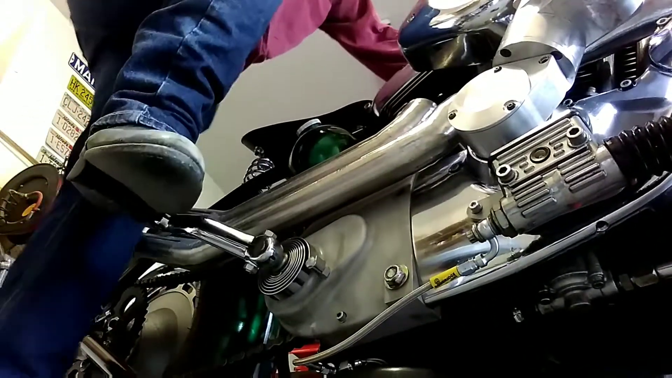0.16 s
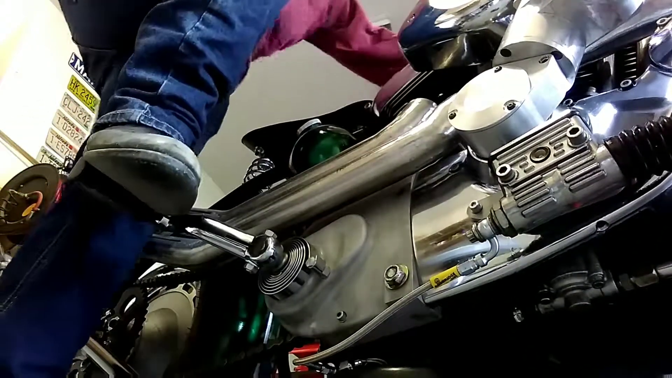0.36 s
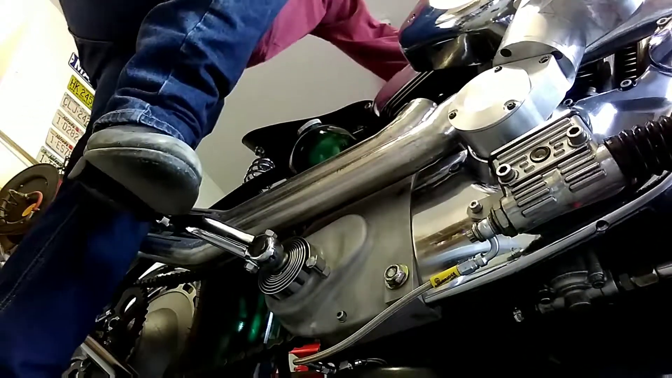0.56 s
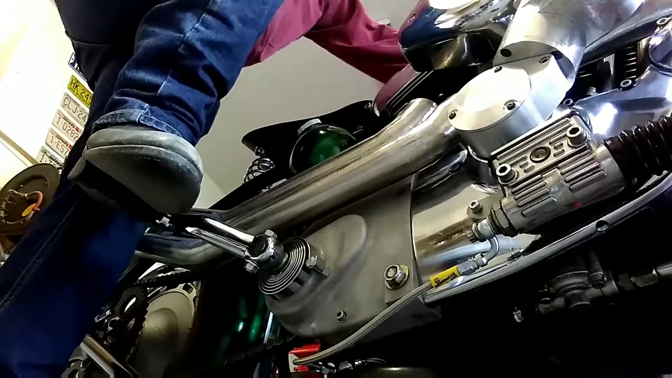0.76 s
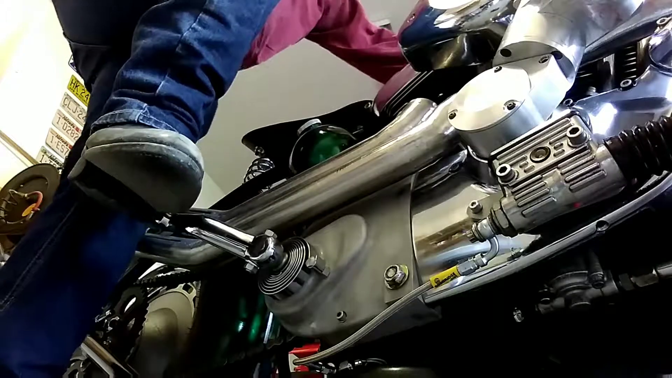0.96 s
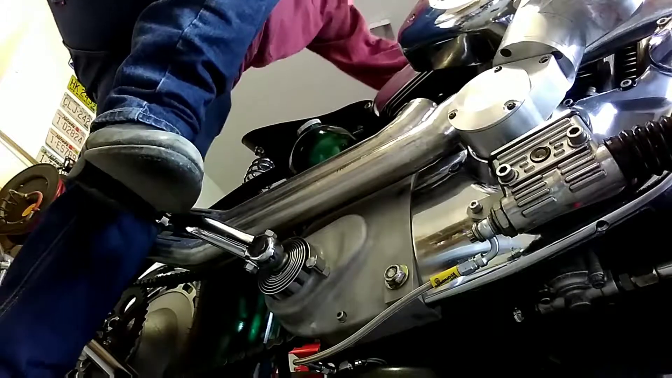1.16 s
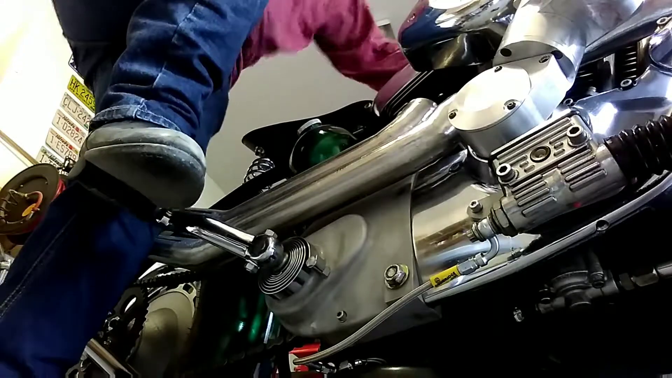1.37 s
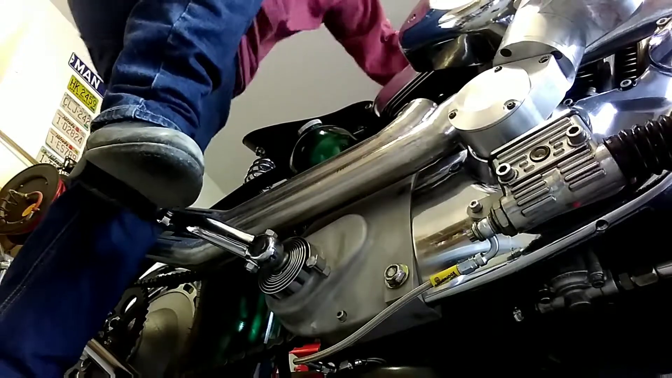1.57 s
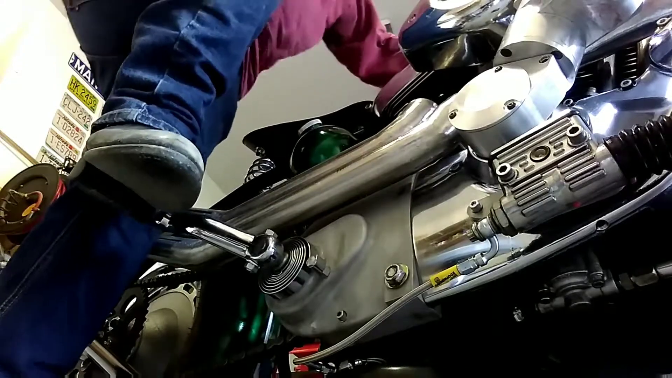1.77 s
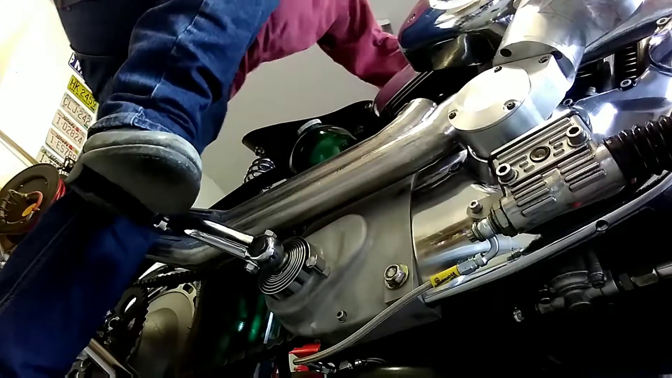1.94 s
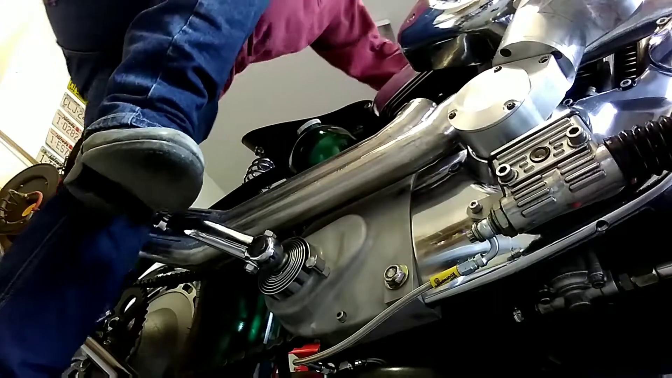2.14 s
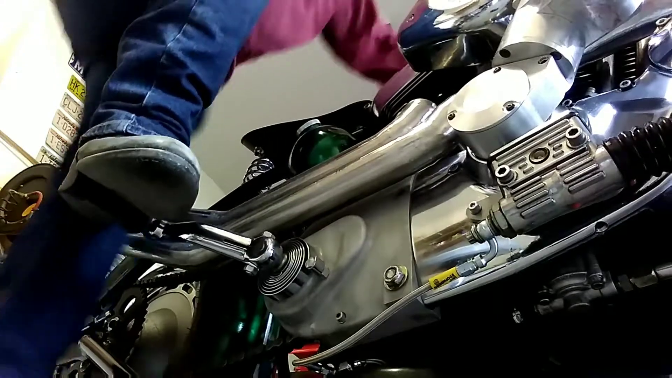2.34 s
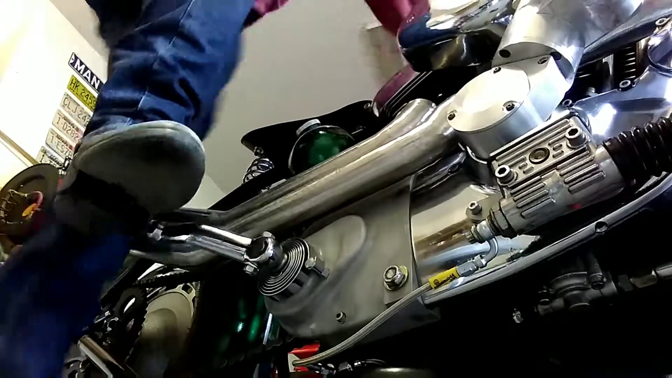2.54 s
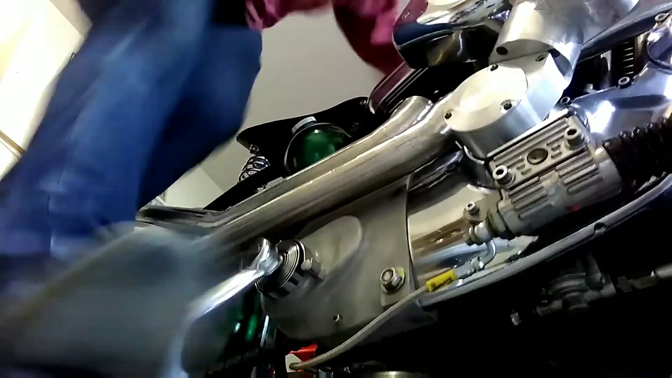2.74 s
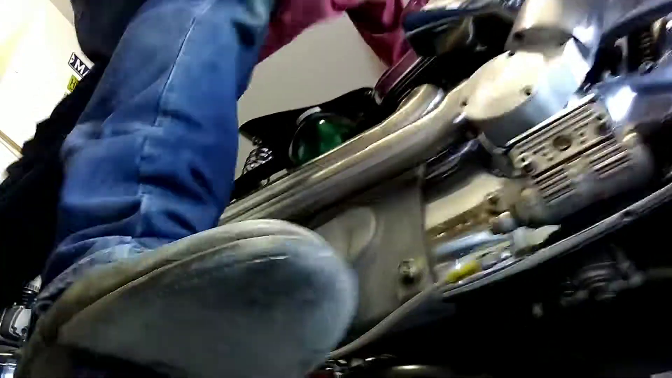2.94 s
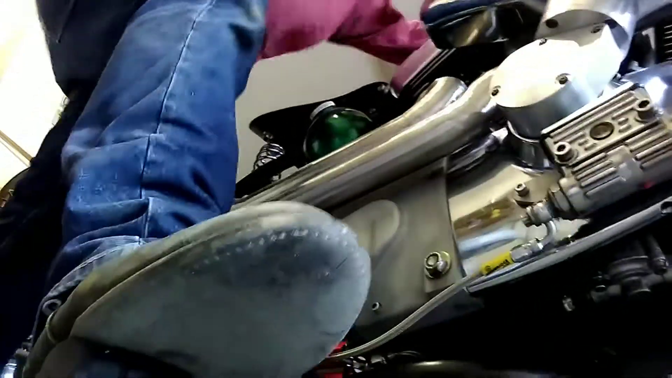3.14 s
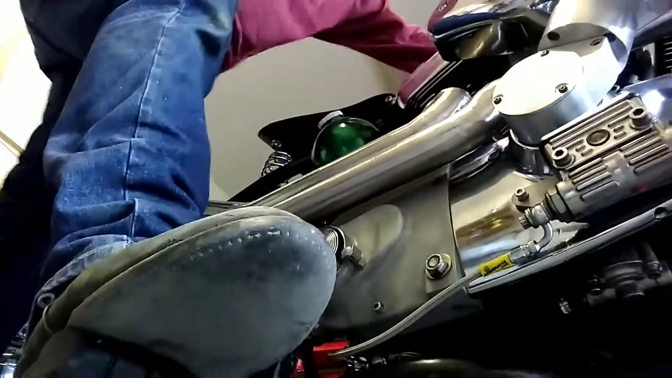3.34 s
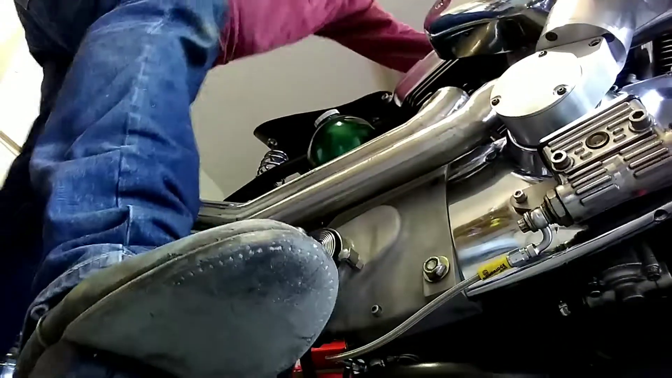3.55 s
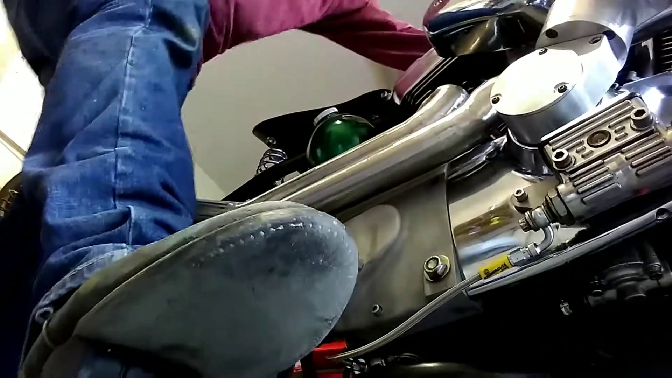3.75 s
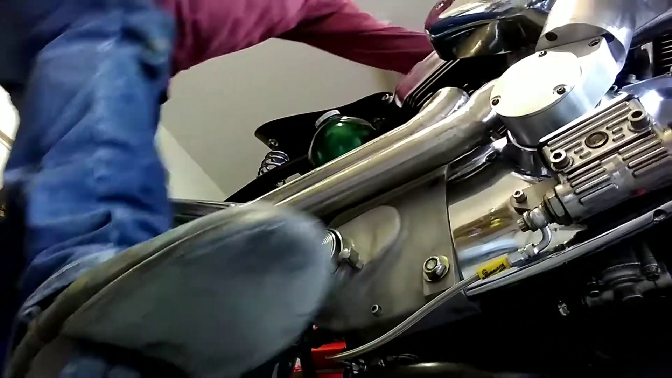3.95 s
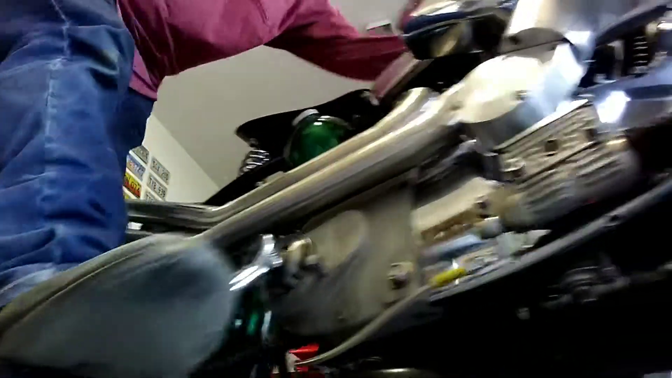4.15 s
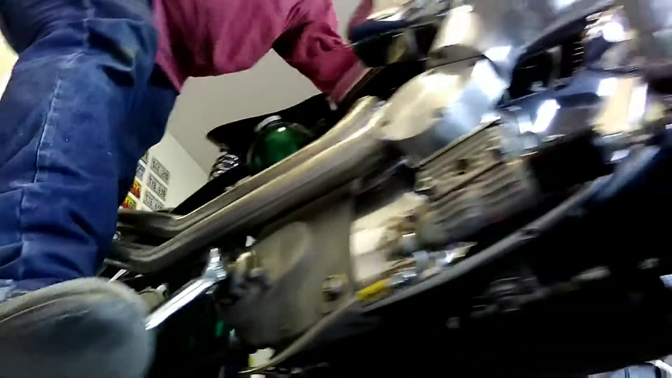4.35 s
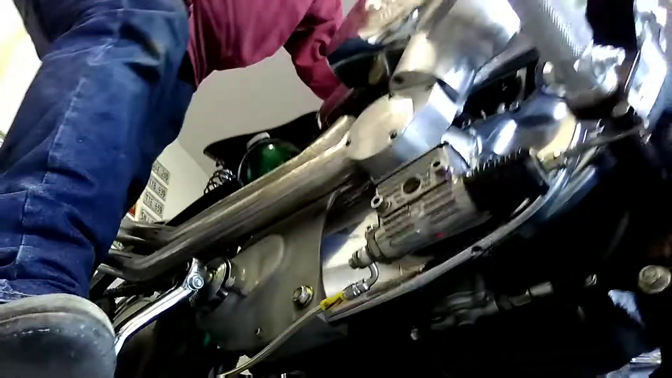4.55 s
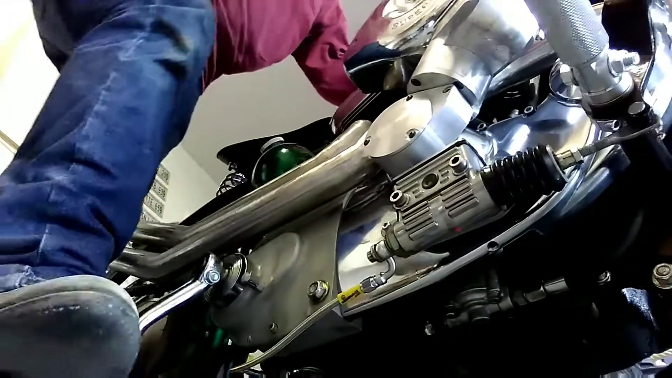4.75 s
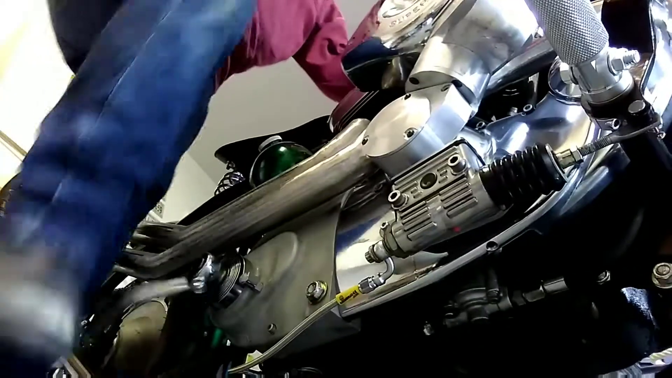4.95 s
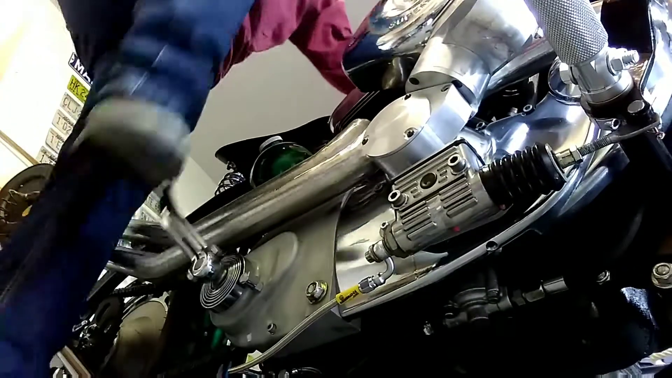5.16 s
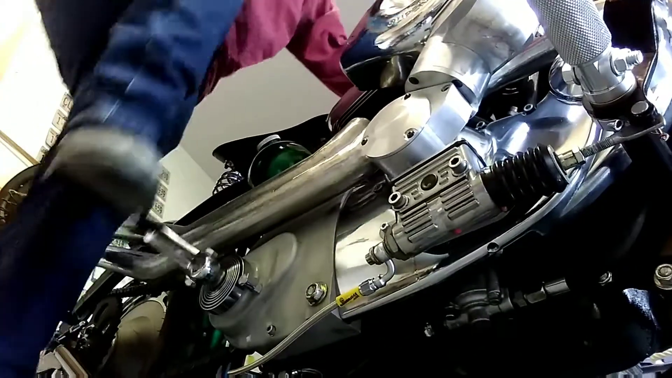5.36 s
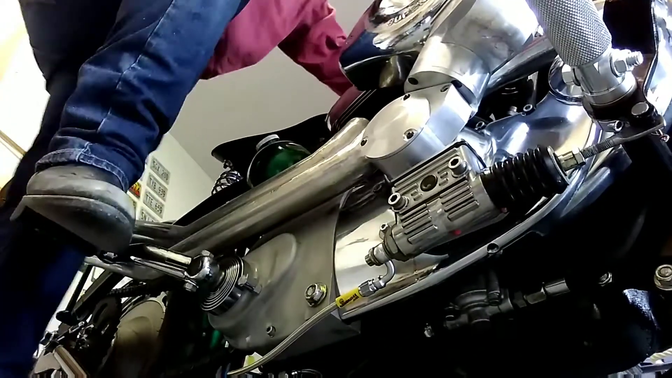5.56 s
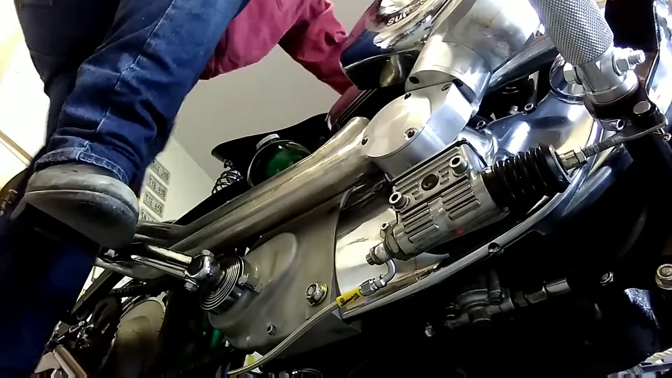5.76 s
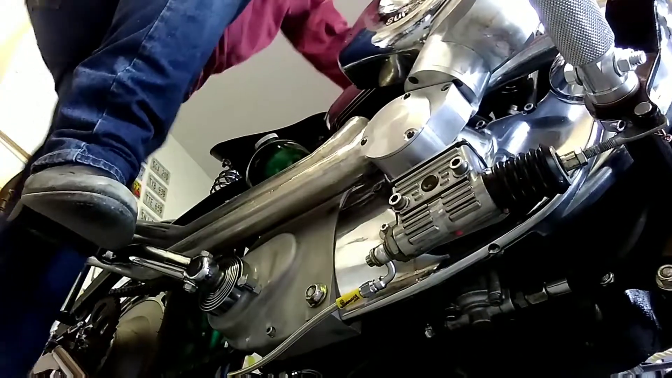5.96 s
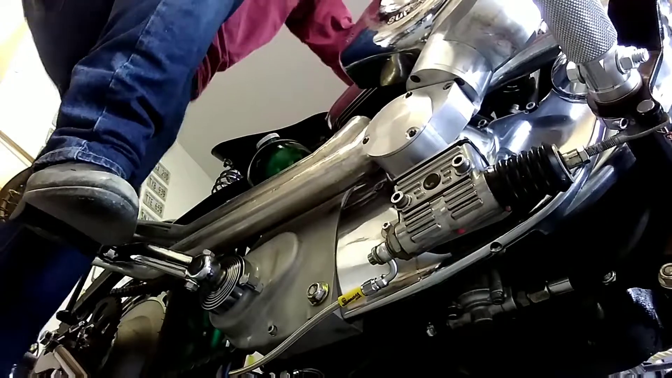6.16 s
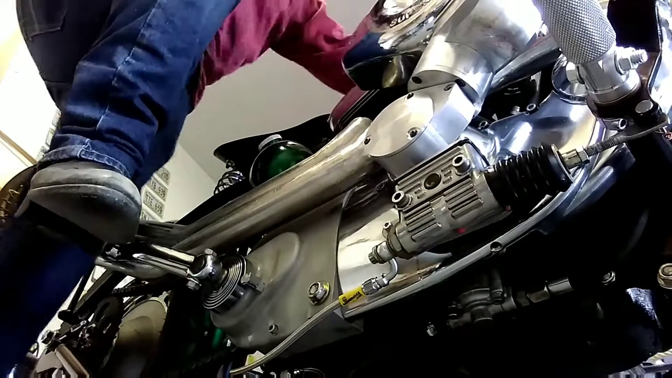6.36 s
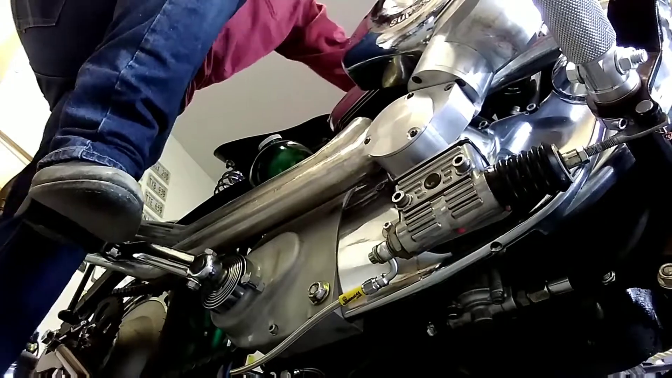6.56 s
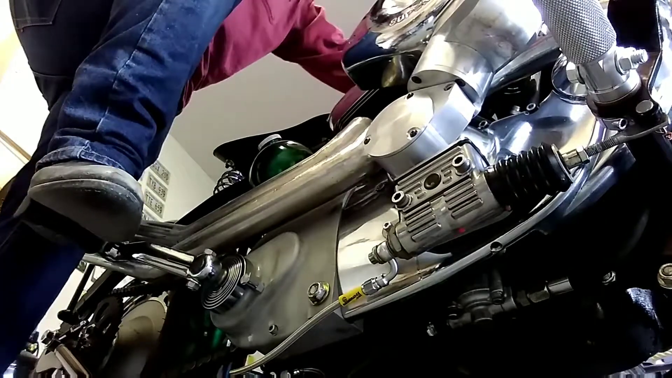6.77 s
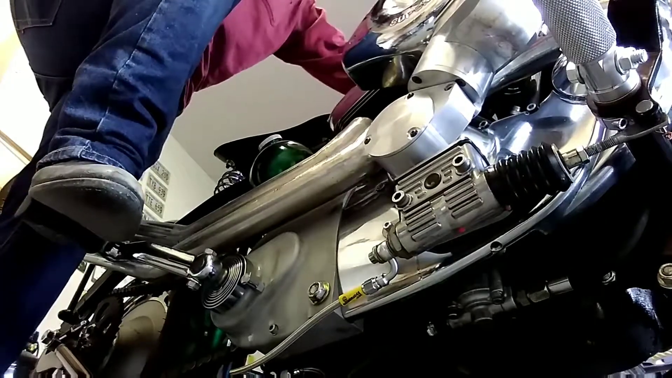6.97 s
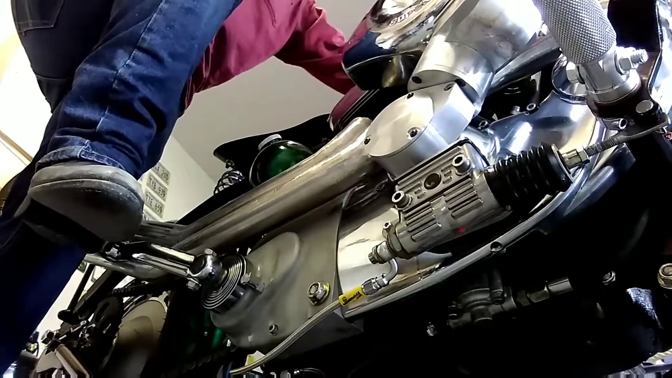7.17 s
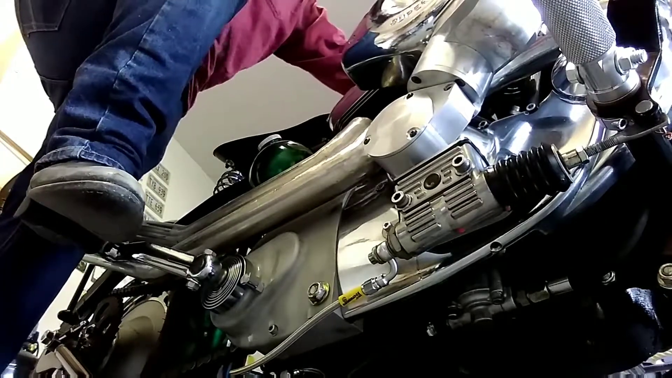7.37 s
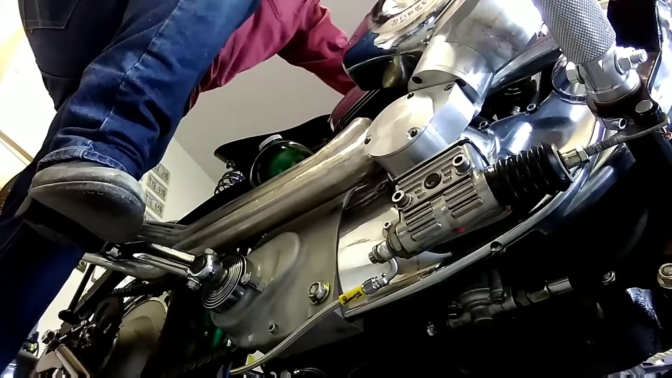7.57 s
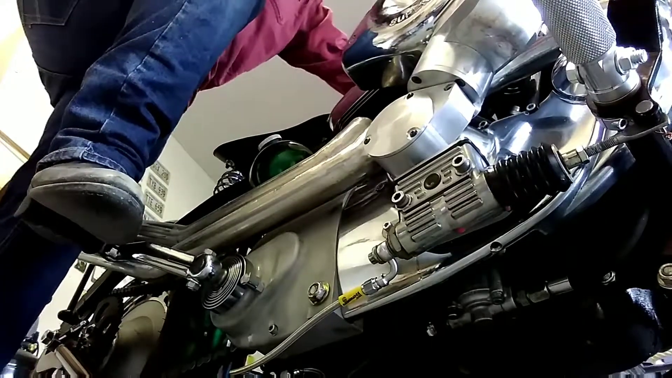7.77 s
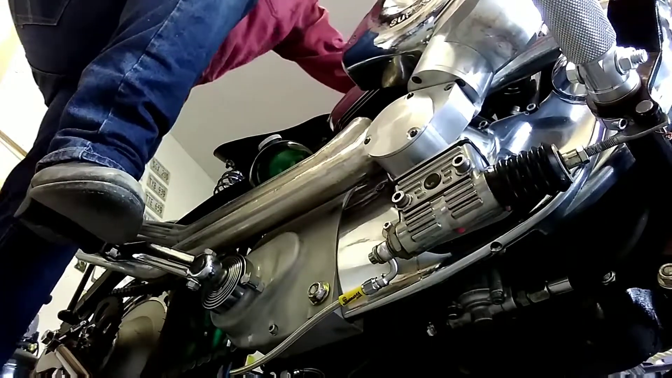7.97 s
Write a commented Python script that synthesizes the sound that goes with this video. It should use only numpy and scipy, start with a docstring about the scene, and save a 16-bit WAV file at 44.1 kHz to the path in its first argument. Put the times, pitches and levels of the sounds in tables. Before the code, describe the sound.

A motorcycle kick-starter slams down in a garage; the engine whirrs and gulps air without catching, then the lever ratchets back with metallic clicks.

```python
"""A motorcycle in a bare-walled garage, close to the microphone, is kicked over once and does not catch.
Over low rumble and faint hum, a sole scuffs and squeaks, denim (filtered grains) swishes and parts knock.
The lever bottoms out and shakes the frame (decaying low modes); the engine whirrs (grains), gulps air
five times (gliding resonances) and runs down. The lever comes up with a clank and a burst of ratchet teeth
(ringing modes and noise); then air creeps into the intake, denim swishes and small parts knock to the end."""
import sys
import numpy as np
from scipy import signal
from scipy.fft import rfft, irfft
from scipy.io import wavfile
from scipy.ndimage import uniform_filter1d, minimum_filter1d

SR = 44100
rng = np.random.default_rng(int(sys.argv[2]) if len(sys.argv) > 2 else 0)


def dump_mix(stems):
    """Bounce the given channels to the path in sys.argv[1] as a 16-bit WAV at rate SR."""
    frames = np.atleast_2d(stems).T  # one column per channel
    limited = np.clip(frames, -1, 1)  # hard clip at full scale
    pcm = np.round(limited * 32767).astype(np.int16)
    wavfile.write(sys.argv[1], SR, pcm)


N = 353241
T = np.arange(N) / SR
HIT_T = T[:SR // 2]
TOP_HZ = 15700  # upper limit of the recorded sound

# Room rumble, spectrum: hz, level_db
RUMBLE_COLOUR = [(25,-15), (55,-2), (86,-12.5), (122,-3), (160,-14), (340,-19), (700,-27.5), (1500,-30),
                 (3600,-38), (7000,-38.5), (11200,-32), (15500,-46)]
# Shoe scuffing on the lever: start_s (peak), relative level_db, rise_s, fall_s
SCUFFS = [ (.01, -48.5, 0.038, .04), (1.24, -70.5, .11, .12), (1.92, -70, 0.15, .06),
          (2.29, -66.5, 0.028, .06), (2.445, -50, 0.037, .025), (4.115, -43.5, 0.016, 0.022),
          (4.68, -42.5, .05, 0.048), (4.921, -42.5, .01, .01), (7.61, -51.5, .03, .04)]
# Squeaks of the rubber sole: start_s (middle), level_db, half_length_s, pitch_hz, glide_octaves_per_s, width_hz
SQUEAKS = [ (.015, -52.5, 0.033, 1056, -1, 400), (1.865, -67, 0.036, 4000, 2.5, 420),
           (2.325, -66, 0.044, 4010, 6, 420), (4.015, -58.5, 0.021, 1770, 2.5, 450),
           (7.13, -76.5, 0.073, 3630, 1, 602), (7.535, -59, .02, 2200, -7, 481)]
# Swishes of denim: start_s (peak), level_db, rise_s, fall_s
SWISHES = [(.155,-39.5,0.023,0.037), (0.248,-46,.0015,0.0063), (1.11,-55,0.029,0.054),
           (1.25,-56,0.034,0.032), (2.0,-56.5,0.022,0.022), (2.222,-56.5,0.0024,0.068),
           (2.342,-50,0.0025,0.01), (2.475,-38,0.037,0.017), (2.787,-18.5,0.039,0.041),
           (2.959,-16,0.012,0.01), (3.055,-11,0.0091,0.024), (3.737,-16.5,0.017,0.021),
           (4.475,-62,.002,0.023), (5.65,-36.5,0.026,0.02), (6.066,-30.5,0.0082,0.031),
           (6.133,-25.5,0.014,0.016), (6.174,-38.5,.002,.012), (6.227,-40,0.0025,0.011),
           (6.55,-65,0.063,0.087), (6.77,-65,0.076,0.034), (7.36,-51.5,0.0066,0.036),
           (7.6,-46.5,0.0054,0.049)]
# Denim, spectrum: hz, level_db
DENIM_COLOUR = [(300, -44), (1200, -27), (2200, -17), (5000, -13.5), (7500, -13.5), (10000, -7.5),
                (12400, 2.5), (14000, -4), (15800, -6.5)]
# Air drawn slowly through the intake: start_s (peak), level_db, rise_s, fall_s, pitch_hz, glide_octaves_per_s
DRAUGHTS = [ (.2, -60, 0.16, 0.19, 668.2, .05), (2.972, -27, 0.014, 0.021, 684.2, 1),
            (3.33, -37, .04, 0.094, 653, .1), (3.65, -49, 0.061, .045, 683.1, .7),
            (5.6, -42, 0.15, 0.077, 643.4, 1.15)]
# Resonances of hissing air: centre_hz, width_hz, relative level_db
HISS_BANDS = [(4300, 210, -22), (7170, 1400, -16), (8400, 210, -12), (9920, 550, -1.5), (10750, 300, -7.5),
              (11030, 320, -6), (12150, 350, -8)]
# Lever and linkage knocks: start_s, level_db, centre_hz, thud_db, click_db, t60_s
KNOCKS = [ (0.246, -56.5, 500, 7, -17, 0.099), (.917, -49, 1836, -27, -6.5, .14),
          (1.402, -64.5, 1200, -37, -27, .08), (1.512, -62.5, 1810, -7, -27, .06),
          (2.622, -43.5, 659, -20.5, -12, .14), (2.677, -33.5, 671, -25.5, -16.5, .09),
          (2.781, -3, 1181, -6, -10.5, .07), (2.804, -18.5, 879, -3.5, -17, .09),
          (2.953, -22.5, 2630, -3.5, -6.5, .09), (3.025, -26.5, 886, 3.5, -8, .035),
          (3.148, -27, 1130, 2.5, -13, .07), (3.23, -24.5, 1290, -18, -20, .25),
          (3.319, -30, 1900, -13.5, -21, .04), (3.384, -30.5, 2410, -7.5, -18, .09),
          (3.653, -39, 1471, -29, -3, .07), (4.091, -45.5, 700, -29.5, -29, 0.2),
          (4.135, -37, 1510, -16.5, -10.5, 0.18), (4.537, -42.5, 617.5, -1.5, -10.5, .11),
          (4.582, -21, 1240, -16.5, -19.5, 0.26), (4.656, -44.5, 2000, 3, -1, .13),
          (4.742, -47, 598.4, 0, -27, .13), (4.882, -46.5, 1200, -23.5, -23, .22),
          (4.928, -22.5, 1880, -22, -15, .12), (5.313, -20, 1094, -19.5, -16, .15),
          (6.156, -55, 218, 3, -8, .11), (6.222, -57.5, 199.8, 4, -16, .1),
          (7.272, -58, 1910, -33, -9, .13), (7.351, -39.5, 1069, -40, -12.5, .092),
          (7.494, -50.5, 3600, -28, -34, .074), (7.513, -51.5, 2230, -34, -14, .09),
          (7.59, -46.5, 1110, -31, 0.5, .16), (7.948, -56.5, 2700, -17, -9, .22)]
# Ringing engine case, before contact damping: pitch_hz, relative level_db, t60_s
CASE_MODES = [(428, -1.5, 0.71), (678.6, 2, 0.22), (815, 0, 0.1), (881, -0.5, 0.36), (1123, -2.5, 0.16),
              (1682, -7, 0.19), (2130, -5.5, 0.3), (2550, -4.5, 0.34), (2724, -3, .18), (2780, 0, .24),
              (2990, 0.5, 0.22), (3032, 1.5, 0.13)]
# Knock body and sole scuff, spectrum: hz, level_db
KNOCK_COLOUR = [(150, -15.5), (350, 2), (750, -0.5), (1400, -1.5), (2100, -1.5), (2900, -2), (3400, -4.5),
                (5000, -18), (9000, -27.5), (15000, -44)]
# Thud from the frame, spectrum: hz, level_db
THUD_COLOUR = [(50, -23.5), (110, -8), (180, -0.5), (300, -2.5), (420, -2.5), (700, -26.5), (3000, -53)]
# Click of the contact, spectrum: hz, level_db
CLICK_COLOUR = [(1000, -34.5), (2500, -14.5), (4500, 2.5), (8000, -4.5), (11500, 0.5), (15500, -12.0)]
# Turns of the engine: start_s (gulp peak), gulp_db, gulp_half_length_s, pitch_hz, glide_octaves_per_s,
# hiss_db, stroke_half_length_s (its fall; the rise is shorter)
TURNS = [ (2.753, -22, .032, 543, -5.5, -24.5, 0.069), (2.943, -19, .01, 553, 5, -28.5, 0.072),
         (3.137, -27, .024, 608.3, 6.5, -29.5, .06), (3.348, -31.5, .014, 633.7, 0, -32.5, 0.084),
         (3.586, -35.5, 0.0091, 608, 3.5, -45, 0.18)]
# Chattering gears, spectrum: hz, level_db
GEAR_COLOUR = [(60, -2), (160, -4.5), (320, -7.5), (650, -10.5), (1000, 0), (2200, -1), (3400, -4.5),
               (4600, -17), (8000, -11.5), (15000, -35)]
# Jolts that rock the frame: start_s, level_db, rise_s, t60_s
JOLTS = [(2.791, -6, 0.0017, 0.59), (3.136, -23, 0.019, 0.82), (3.352, -26, 0.0024, 0.27),
         (5.02, -42, .02, .7), (5.318, -38.5, 0.0034, .2)]
# Modes of the frame: pitch_hz, relative level_db, share of the jolt's t60 (no unit)
FRAME_MODES = [(48.24, -1, 1), (98, -7.5, 0.51), (147, -10, .45)]
# Ratchet teeth: start_s, relative level_db, relative lever_ring_db, treble_db
TEETH = [(4.955, -7, 6, -2), (4.991, 1.5, -4.5, 0), (5.023, -3.5, -1.5, -2), (5.057, -2.5, -10, 3),
         (5.097, -1.5, -5.5, 0), (5.131, -3, -9.5, 4), (5.180, -3, -16, 4)]
# Ringing ratchet gear: pitch_hz, relative level_db, t60_s
GEAR_MODES = [(2440, -5.5, 0.59), (3605, -4.5, 0.3), (3750, -0.5, 0.22), (3870, 1, 0.2), (4030, 5.5, 0.11),
              (6551, -7.5, 0.25), (10794, 3, 0.22), (12120, -4, 0.13)]
# Ringing kick lever: pitch_hz, relative level_db, t60_s
LEVER_MODES = [(946, -8, 0.18), (1173, -9, 0.13), (1177, -7.5, 0.13), (1684, -4, 0.08), (2060, 6.5, 0.074),
               (2160, 1, 0.16), (2190, -0.5, 0.18), (2329, 2.5, 0.14), (2510, -2, .15), (2560, -2, 0.13)]
# Crack of a tooth, spectrum: hz, level_db
TOOTH_COLOUR = [(35, -53), (60, -30), (167, -24), (220, -12.5), (359, -12), (585, -6), (642, -10.5),
                (1120, -1), (1590, -8.5), (2410, 0), (4850, -12), (6560, -10.5), (7720, -16), (10700, -8),
                (15500, -18)]
# Garage reverberation: hz, t60_s
ROOM_T60 = [(100, 0.47), (500, 0.73), (1200, 0.72), (2500, 0.69), (5000, 0.59), (9000, 0.47), (15000, 0.09)]
# Garage echoes, spectrum: hz, level_db
ECHO_COLOUR = [(100, 1.0), (600, -3), (2500, -7.5), (6000, -7), (12000, -6.0)]

# The kick spins the gears up until the lever bottoms out; they coast down and stop
BOTTOM_S, STOP_S = 2.76, 3.68
SPIN_UP_DB_PER_S, COAST_DB_PER_S = 171, 26
STOP_DB_PER_S = 86  # on top of the coasting


def undb(db):
    """Decibels to amplitude."""
    return 10 ** (np.asarray(db) / 20)


def unit(x):
    """Scale to rms 1."""
    return x / np.sqrt(np.mean(x ** 2))


def struck(x):
    """Scale a blow to rms 1 over its first hundredth of a second."""
    return x / np.sqrt(np.mean(x[:SR // 100] ** 2))


def fade(t, t60):
    """Exponential decay by 60 dB in t60 seconds."""
    return np.exp(-np.log(1000) * t / t60)


def add(out, s, x):
    """Mix x in at time s."""
    i = int(s * SR)
    out[i:i + len(x)] += x[:N - i]


def band(x, lo_hz, hi_hz, order=2):
    """Band-pass."""
    edges = [lo_hz, min(hi_hz, SR / 2 - 1)]
    return signal.sosfilt(signal.butter(order, edges, "band", fs=SR, output="sos"), x)


def colour(x, points, size=4096):
    """Causal minimum-phase filter through (hz, level_db) points."""
    hz, db = np.transpose(points)
    grid = np.linspace(1, SR / 2, size // 2 + 1)
    level_db = np.interp(np.log(grid), np.log(hz), db)
    # folding the cepstrum forward in time makes the filter causal
    cepstrum = irfft(np.log(undb(level_db)))
    cepstrum[1:size // 2] *= 2
    cepstrum[size // 2 + 1:] = 0
    impulse = irfft(np.exp(rfft(cepstrum)))
    return signal.oaconvolve(x, impulse)[:len(x)]


def walk(rate):
    """Smooth random wandering of rms 1, with rate new targets per second."""
    k = int(SR / rate)
    steps = np.repeat(rng.standard_normal(N // k + 1), k)
    return unit(uniform_filter1d(steps, k)[:N])


def grains(rate, spread_db):
    """Dense tiny clicks of uneven size, rate per second."""
    hits = rng.random(N) < rate / SR
    size = rng.standard_normal(N) * undb(spread_db * rng.standard_normal(N))
    return unit(hits * size)


def swell(s, rise, fall, roundness):
    """A smooth rise to 1 at time s and a fall; the higher the roundness, the flatter the top."""
    distance = np.abs(T - s) / np.where(T < s, rise, fall)
    near = distance < 10
    out = np.zeros(N)
    out[near] = np.exp(-distance[near] ** roundness / 2)
    return out


def swells(rows, roundness):
    """Joint loudness of (start_s, level_db, rise_s, fall_s) strokes."""
    return sum(undb(db) * swell(s, rise, fall, roundness) for s, db, rise, fall in rows)


def hoot(hz, width_hz):
    """Turbulence ringing an air resonance whose pitch moves."""
    lowpass = signal.butter(2, width_hz / 2, fs=SR, output="sos")
    a, b = signal.sosfilt(lowpass, rng.standard_normal((2, len(hz))))
    phase = 2 * np.pi * np.cumsum(hz) / SR
    return unit(a * np.cos(phase) + b * np.sin(phase))


def chirps(rows):
    """Short swells of a gliding resonance."""
    out = np.zeros(N)
    for s, db, half, hz, glide, width_hz in rows:
        t = np.arange(-min(3 * half, s), 3 * half, 1 / SR)
        bell = np.exp(-(t / half) ** 2 / 2)
        chirp = unit(hoot(hz * 2 ** (glide * t), width_hz) * bell)
        add(out, s + t[0], undb(db) * chirp * np.sqrt(np.mean(bell ** 2)))
    return out


def jet():
    """Air hissing through a narrow gap."""
    air = rng.standard_normal(N)
    return unit(sum(undb(db) * band(air, hz - width / 2, hz + width / 2, order=1)
                    for hz, width, db in HISS_BANDS))


def ring(modes, scatter_db=3, detune=0.0013):
    """Modes of a part; every blow lands on a different spot and finds it under a different load."""
    hz, db, t60 = np.transpose(modes)[:, :, None]
    size = undb(db + scatter_db * rng.standard_normal(hz.shape))
    hz = hz * (1 + detune * rng.standard_normal(hz.shape))
    cycles = hz * HIT_T + rng.random(hz.shape)
    return struck(np.sum(size * fade(HIT_T, t60) * np.sin(2 * np.pi * cycles), axis=0))


def clatter(t60, hold_s=0):
    """The crowd of short, overlapping modes of a casting, as noise; they fade once the contact ends."""
    return rng.standard_normal(len(HIT_T)) * fade(np.maximum(HIT_T - hold_s, 0), t60)


def stillness(floor_db=-68, hum_db=-76):
    """Low room rumble with a faint mains hum."""
    rumble = unit(colour(rng.standard_normal(N), RUMBLE_COLOUR))
    hum = np.sin(2 * np.pi * 120 * T)
    return undb(floor_db) * rumble + undb(hum_db) * hum


def rider(denim_db=0, scuff_db=-2, denim_roundness=1.53, scuff_roundness=1.5):
    """Denim threads slip past each other; the sole scuffs in fits and squeaks."""
    scuff = unit(colour(grains(3300, 3), KNOCK_COLOUR) * undb(3.3 * walk(35)))
    denim = unit(colour(grains(28000, 0.94), DENIM_COLOUR) * undb(1.6 * walk(120)))
    scuffs = undb(scuff_db) * scuff * swells(SCUFFS, scuff_roundness)
    swishes = undb(denim_db) * denim * swells(SWISHES, denim_roundness)
    return scuffs + swishes + chirps(SQUEAKS)


def intake(gulp_width_hz=150, width_hz=145, upper_ratio=2.2, upper_db=-12, hiss_db=-7, roundness=2.5):
    """Short gulps while the engine spins; a hollow, slowly rising tone when the piston creeps."""
    gulps = chirps([(s, db, half, hz, glide, gulp_width_hz) for s, db, half, hz, glide, *_ in TURNS])
    flows = np.array([undb(db) * swell(s, rise, fall, roundness) for s, db, rise, fall, *_ in DRAUGHTS])
    pitches = np.array([hz * 2 ** (glide * np.clip(T - s, -.5, .5)) for s, *_, hz, glide in DRAUGHTS])
    # the strongest flow sets the pitch; the tiny weight covers the silence
    pitch = np.average(pitches, axis=0, weights=flows + 1e-12)
    upper = undb(upper_db) * hoot(upper_ratio * pitch, 200)
    draught = hoot(pitch, width_hz) + upper + undb(hiss_db) * jet()
    return gulps + draught * flows.sum(axis=0)


def knocks(case_db=2, free_t60=0.26, thud_t60=0.063, contact_s=.0012, below=2.3, above=2.18):
    """Each knock rings the engine case, with a thud from the frame and a click from the contact."""
    out = np.zeros(N)
    for s, db, hz, thud_db, click_db, t60 in KNOCKS:
        # parts that stay pressed together damp the case; a free rebound lets it ring
        case = t60 / free_t60 * ring(CASE_MODES) * fade(HIT_T, 3 * t60)
        rattle = struck(colour(clatter(t60), KNOCK_COLOUR))
        body = struck(band(rattle + undb(case_db) * case, hz / below, hz * above, order=3))
        thud = struck(colour(clatter(thud_t60), THUD_COLOUR))
        click = struck(colour(clatter(t60), CLICK_COLOUR))
        blow = body + undb(thud_db) * thud + undb(click_db) * click
        add(out, s, undb(db) * blow * (1 - np.exp(-HIT_T / contact_s)))
    return out


def engine(gear_db=-24, slack_db=-7, chatter_db=3, hiss_db=0, lag_s=0.011, rise_share=.8, roundness=6.7):
    """Chain and gears chatter as they run down, slackening between turns; a thin hiss escapes on every stroke."""
    load, leak = np.zeros(N), np.zeros(N)
    for s, *_, leak_db, half in TURNS:
        stroke = swell(s + lag_s, rise_share * half, half, roundness)
        load = np.maximum(load, stroke)
        leak += undb(leak_db) * stroke
    since = T - BOTTOM_S
    spin_db = np.minimum(SPIN_UP_DB_PER_S * since, -COAST_DB_PER_S * since)
    spin_db = spin_db - STOP_DB_PER_S * np.maximum(T - STOP_S, 0)
    gears = unit(colour(grains(2500, 0.91), GEAR_COLOUR) * undb(chatter_db * walk(70)))
    whirr = undb(gear_db + spin_db + slack_db * (1 - load)) * gears
    return whirr + undb(hiss_db) * leak * jet()


def frame():
    """The whole machine shudders on its stand; the higher modes die sooner."""
    out = np.zeros(N)
    for s, db, rise, t60 in JOLTS:
        sway = sum(undb(mode_db) * fade(T, share * t60) * np.sin(2 * np.pi * hz * T)
                   for hz, mode_db, share in FRAME_MODES)
        add(out, s, undb(db) * (1 - np.exp(-T / rise)) * sway)
    return out


def ratchet(tooth_t60=0.063, skid_s=0.0067, gear_db=-16, lever_db=-8, level_db=1):
    """The pawl drops off tooth after tooth and skids briefly, ringing gear and lever."""
    out = np.zeros(N)
    for s, db, ring_db, treble_db in TEETH:
        crack = struck(colour(clatter(tooth_t60, skid_s), TOOTH_COLOUR))
        crack = crack + undb(gear_db) * ring(GEAR_MODES, scatter_db=1)
        crack = colour(crack, [(2500, 0.0053), (7000, treble_db)])
        lever = undb(ring_db + lever_db) * ring(LEVER_MODES)
        add(out, s, undb(db + level_db) * (crack + lever))
    return out


def garage(x, wet_db=-8, build_s=0.002):
    """Diffuse echoes from bare walls; the treble dies first."""
    hz, t60 = np.transpose(ROOM_T60)
    t = T[:SR]
    edges = np.geomspace(110, 17000, 9)
    tail = sum(band(rng.standard_normal(SR), lo, hi) * fade(t, np.interp(np.sqrt(lo * hi), hz, t60))
               for lo, hi in zip(edges, edges[1:]))
    tail = tail * (1 - np.exp(-t / build_s))
    tail = colour(tail / np.sqrt(np.sum(tail ** 2)), ECHO_COLOUR)
    return x + undb(wet_db) * signal.oaconvolve(x, tail)[:N]


def scene():
    """Rider and machine sound in the garage; frame shudder and room floor reach the microphone without echo."""
    echoing = rider() + intake() + knocks() + engine() + ratchet()
    return (garage(echoing) + frame() + stillness())[None]


def record(dry, ceiling=0.86, hold_s=0.0023):
    """The top is cut, a fast limiter flattens the loudest blows, and the top is cut again."""
    top_cut = signal.ellip(10, .2, 80, TOP_HZ, fs=SR, output="sos")
    heard = signal.sosfilt(top_cut, dry)
    size = max(int(hold_s * SR), 1)
    gain = np.minimum(1, ceiling / (np.abs(heard) + 1e-9))
    limited = heard * uniform_filter1d(minimum_filter1d(gain, size), size)
    return signal.sosfiltfilt(top_cut, limited)


dry = scene()
out = record(dry)
dump_mix(out)
```